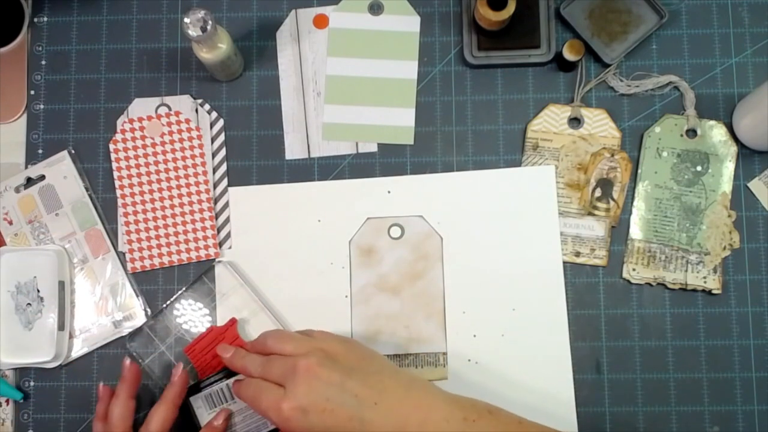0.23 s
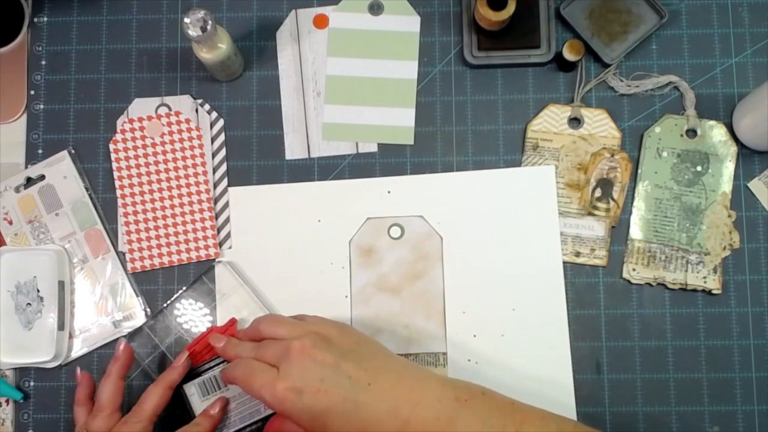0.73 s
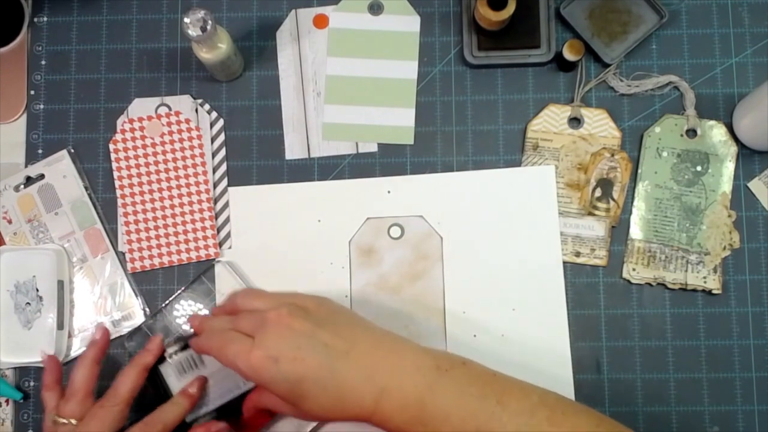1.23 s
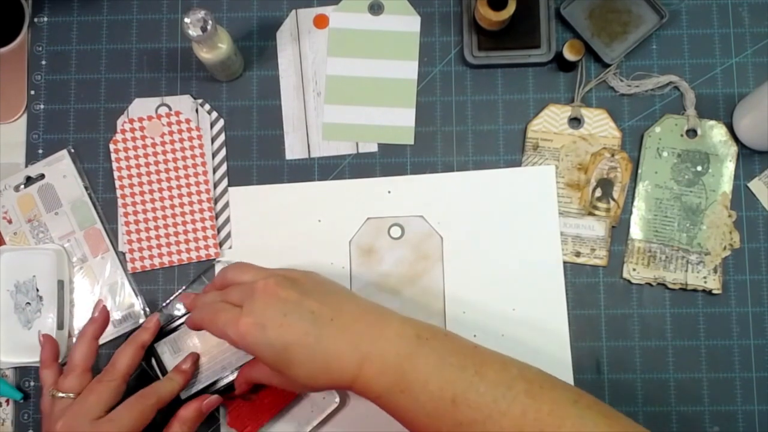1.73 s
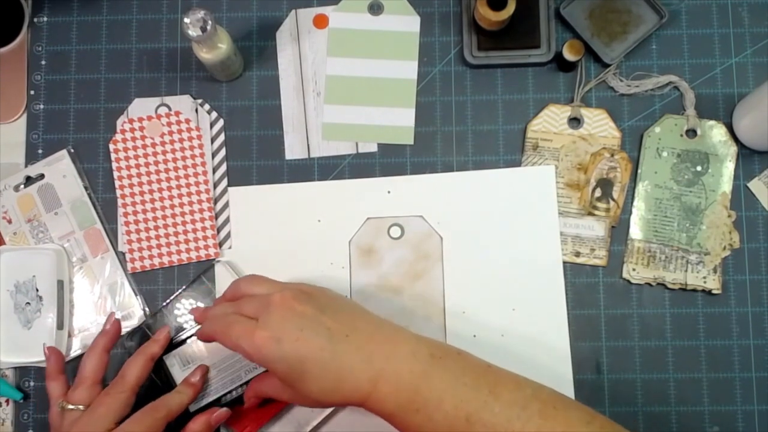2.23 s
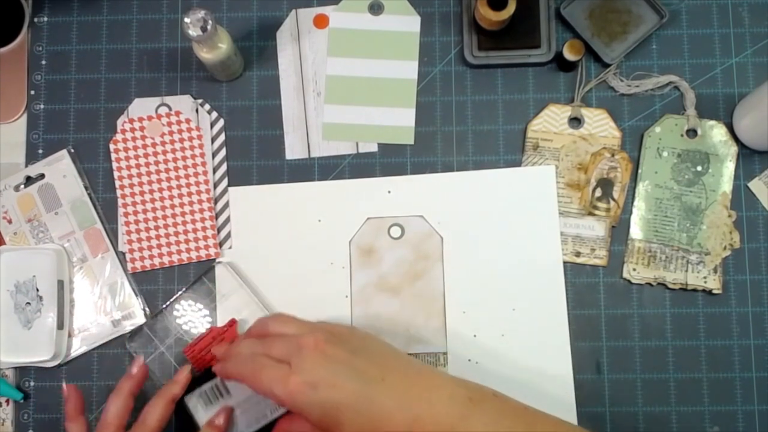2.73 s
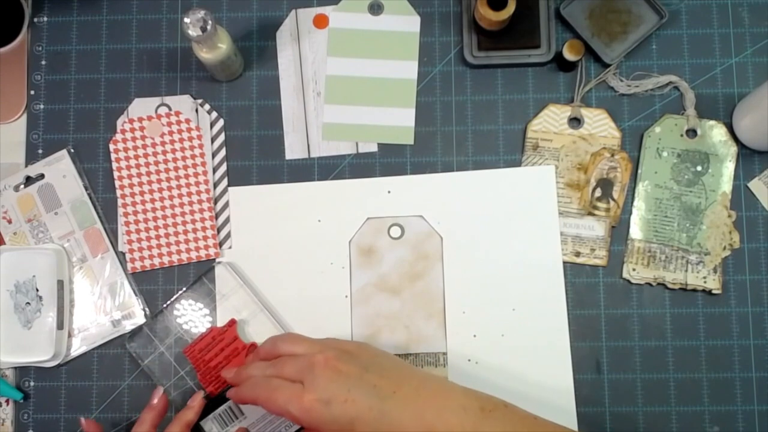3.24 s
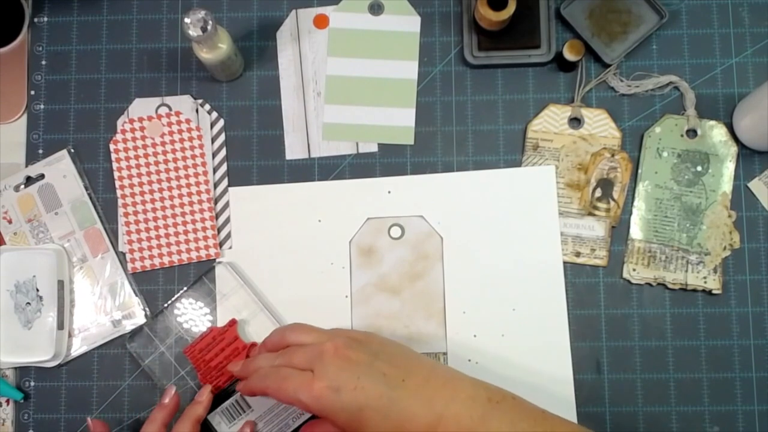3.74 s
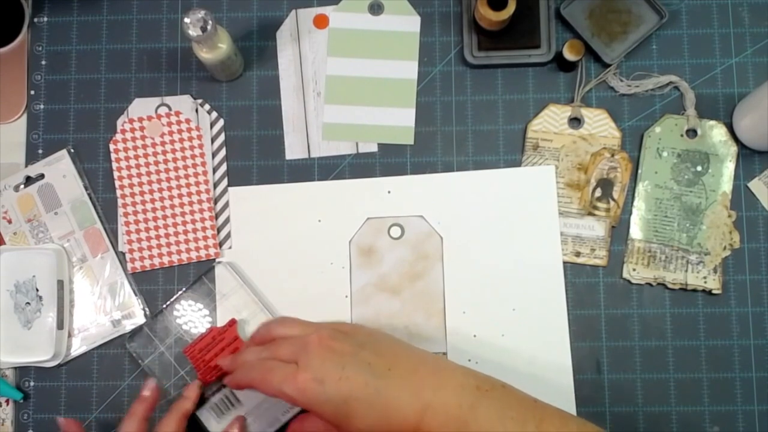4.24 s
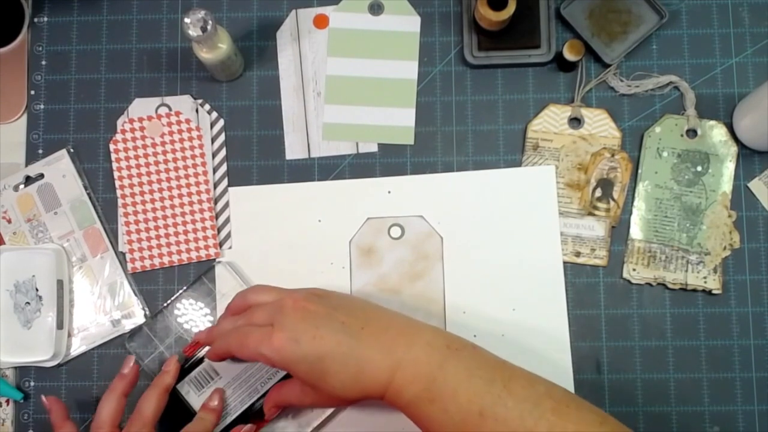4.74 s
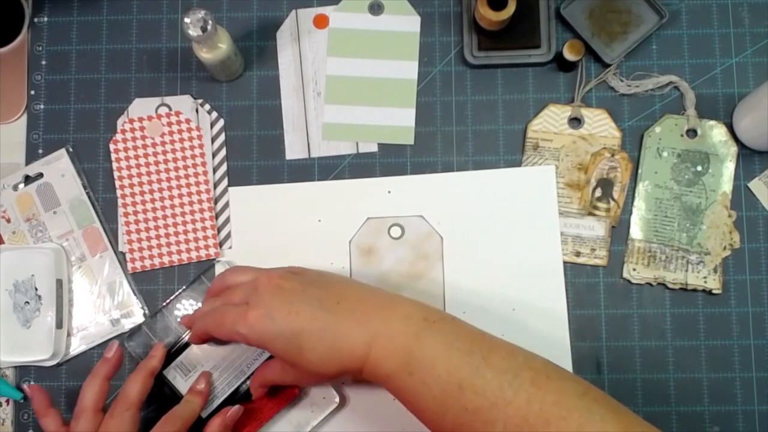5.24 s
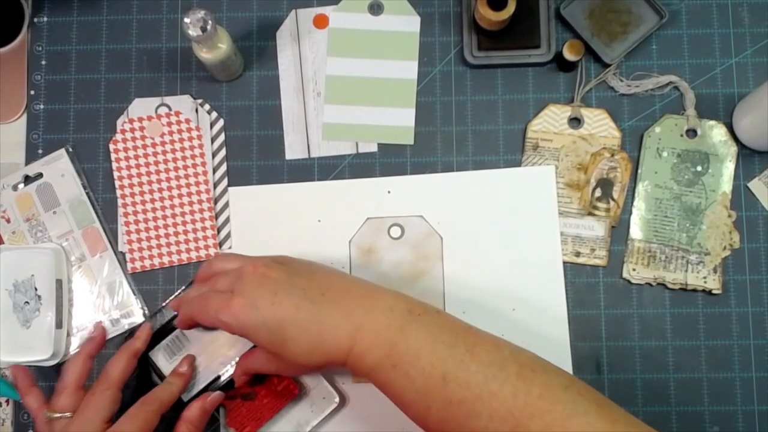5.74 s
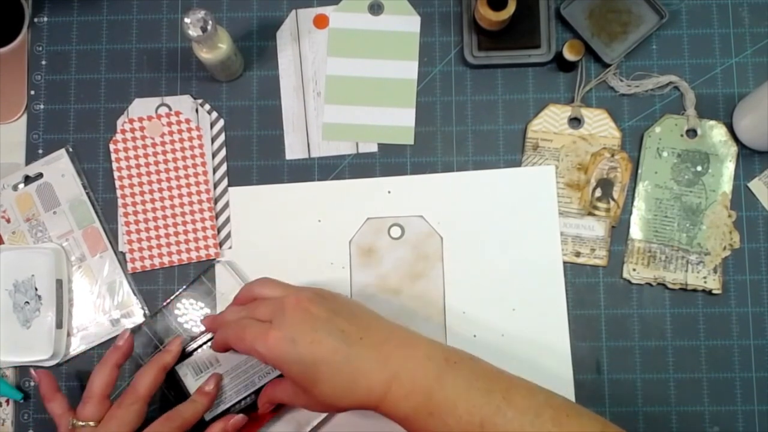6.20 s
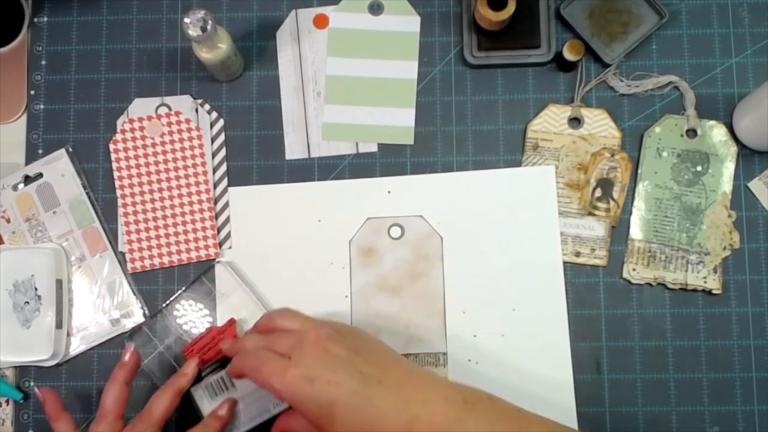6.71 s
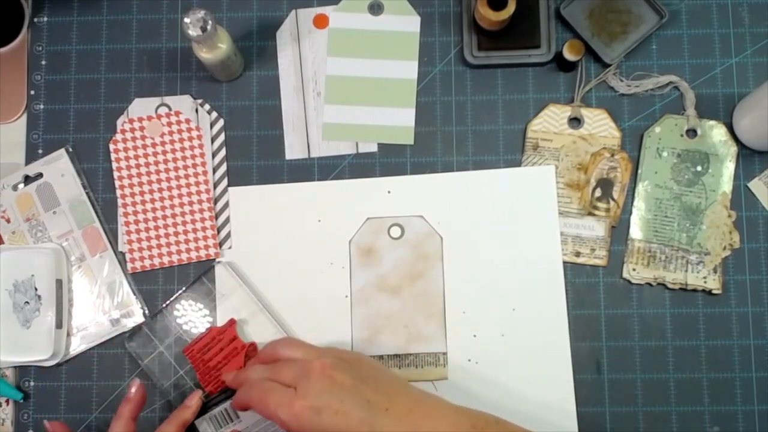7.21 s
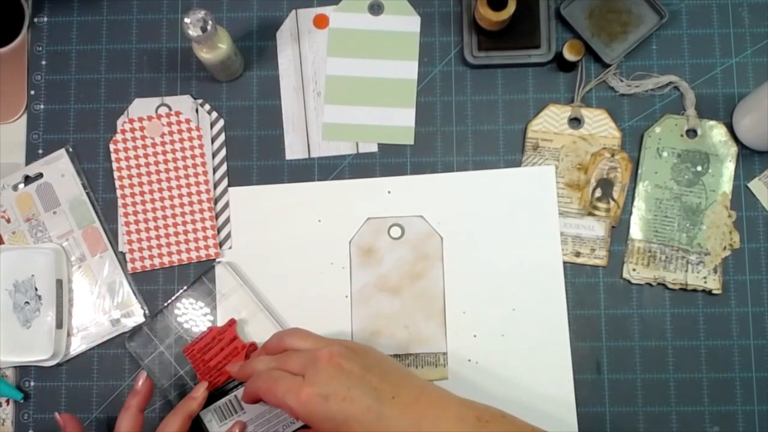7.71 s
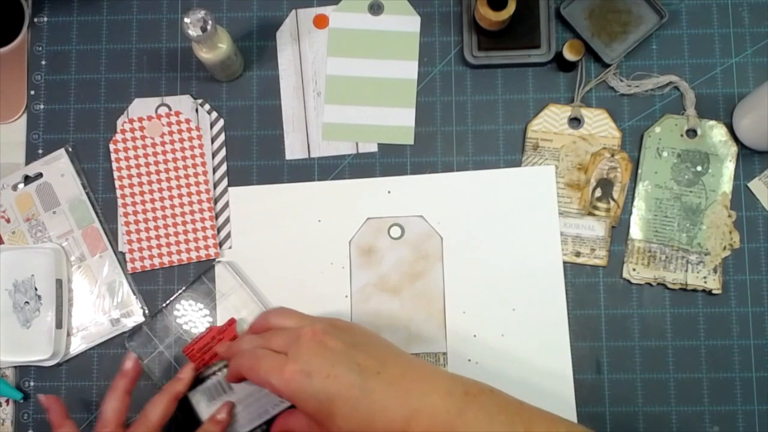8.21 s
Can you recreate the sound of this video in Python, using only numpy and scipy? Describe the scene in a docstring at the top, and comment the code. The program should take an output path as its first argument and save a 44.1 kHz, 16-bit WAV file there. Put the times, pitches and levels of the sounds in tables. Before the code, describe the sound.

Over a steady low hum and the soft rush of a fan, an ink pad pats a rubber stamp on a desk in a regular rhythm. The dull taps, a few harder than the rest, shake the nearby microphone and make a loose part knock lightly. Tacky ink crackles faintly, the plastic case clicks now and then, and the pad briefly judders about halfway through. The small room adds little echo.

```python
"""A low mains hum and a fan sound throughout; over them an ink pad is dabbed 22 times onto a rubber stamp. Each
impact rings the modes of the stamp's block and the desk and sets the microphone's stand swaying; a loose part
knocks on the first swings. Threads of tacky ink snap as the pad is pressed and peeled off. The plastic case
clicks and squeaks now and then, after the hardest dab the block rocks and drops back with a clatter, and once
the pad judders by stick-slip friction."""
import sys
import numpy as np
from scipy import signal
from scipy.fft import rfft, irfft
from scipy.io import wavfile
from scipy.ndimage import uniform_filter1d

SR = 44100
rng = np.random.default_rng(int(sys.argv[2]) if len(sys.argv) > 2 else 0)


def materialize(psi):
    """Save the field psi as 16-bit PCM at rate SR to the path in sys.argv[1].

    A 1-D psi becomes a single channel; in a 2-D psi each row is a channel.
    """
    bounded = np.clip(np.atleast_2d(psi).T, -1, 1)
    quanta = np.round(bounded * 32767).astype(np.int16)
    wavfile.write(sys.argv[1], SR, quanta)


N = 373086

# Sustained tones, the mains hum first and then the fan's whines: (frequency [Hz], rms level [dB])
TONES = [(120, -44.7), (3462, -75.5), (3995, -70.7), (4662, -76.5), (5717, -85)]
# Impacts of the pad, with relative levels:
# (time [s], thump [dB], desk tuning [Hz], clack [dB], rattle [dB], time held down [s], peel [dB])
DABS = [(.541, -21, 90, -40, -39, .195, -63), (.91, -17, 84, -33, -31, .206, -64),
        (1.303, -17.3, 76, -23.5, -31.5, .2, -67), (1.674, -21, 78, -37, -33, .2, -74),
        (2.076, -22, 77, -48, -36, .203, -65), (2.462, -10.7, 82, -24.5, -30, .187, -63),
        (2.831, -24.5, 72, -31, -31.5, .197, -68), (3.187, -21.5, 84, -35, -32.3, .223, -67),
        (3.563, -21, 74, -41, -34, .2, -74), (3.922, -21.5, 76, -37, -33, .208, -67),
        (4.294, -22, 76, -35, -32, .195, -64), (4.652, -24, 80, -41, -32.5, .19, -64),
        (5.027, -15.3, 74, -18.5, -33, .238, -67), (5.371, -27, 70, -44, -32.5, .2, -74),
        (5.703, -18.5, 77, -31, -31, .2, -73), (6.078, -21, 81, -56, -39, .2, -71),
        (6.444, -23.5, 80, -35, -32, .207, -58.5), (6.806, -21.5, 90, -40, -39, .227, -61),
        (7.173, -23, 86, -48, -34, .2, -74), (7.55, -18, 80, -26, -32.5, .21, -65),
        (7.912, -27, 82, -35, -34, .196, -59), (8.267, -18, 76, -40, -31.5, .2, -72)]
USUAL_THUMP_DB, USUAL_CLACK_DB, USUAL_RATTLE_DB = -21, -36, -33  # an ordinary dab


def amp(db):
    return 10 ** (np.asarray(db) / 20)


def unit_rms(x):
    return x / np.sqrt(np.mean(x ** 2) + 1e-20)


def clock(seconds):
    return np.arange(int(seconds * SR)) / SR


def spectrum_db(points, hz):
    f, db = np.transpose(points)
    return np.interp(np.log(hz + 1), np.log(f + 1), db)


def add(mix, s, sound):
    part = mix[max(round(s * SR), 0):][:len(sound)]
    part += sound[:len(part)]


def colour(x, spectrum):
    """Minimum-phase filtering imposes a spectrum at unit power gain."""
    size = 2048
    log_gain = np.log(amp(spectrum_db(spectrum, abs(np.fft.fftfreq(size, 1 / SR)))))
    taps = np.fft.ifft(np.exp(np.conj(signal.hilbert(log_gain)))).real[:size // 2]
    return signal.oaconvolve(x, taps / np.linalg.norm(taps))[:len(x)]


def band_noise(edges_hz, count):
    band = signal.butter(2, edges_hz, "band", fs=SR, output="sos")
    return unit_rms(signal.sosfilt(band, rng.standard_normal(count)))


def ring_band(hz, width, t60):
    """Overlapping damped modes act as a band of noise that decays exponentially."""
    t = clock(.2)
    edges = np.minimum(hz * np.exp(np.array([-width, width]) / 2), SR / 2 - 1)
    return band_noise(edges, len(t)) * amp(-60 * t / t60)


def ring_modes(modes, contact_s, rise_cycles, pitch=1, vary_db=2, detune=.019):
    """An impact response is the sum of damped modes convolved with the force pulse; its peak is 1."""
    t = clock(.4)
    free = np.zeros(len(t))
    for hz, db, t60 in modes:
        louder, sharper = rng.standard_normal(2)  # each blow lands a little differently
        cycles = hz * pitch * (1 + detune * sharper) * t
        envelope = amp(db + vary_db * louder - 60 * t / t60) * (1 - np.exp(-cycles / rise_cycles))
        free += envelope * np.cos(2 * np.pi * cycles)
    force = np.sin(np.pi * clock(contact_s) / contact_s) ** 2
    out = signal.fftconvolve(free, force)[:len(t)]
    return out / abs(out).max()


def hardness(thump, clack):
    """Impact strength in dB above an ordinary dab, weighted from thump and clack."""
    return .7 * (thump - USUAL_THUMP_DB) + .35 * (clack - USUAL_CLACK_DB)


def mains_hum():
    """Alternating current drives a vibration of fixed frequency, heard as a pure tone."""
    hz, db = TONES[0]
    return np.sqrt(2) * amp(db) * np.sin(2 * np.pi * hz * np.arange(N) / SR)


def fan(air_db=-48.7, waver_hz=7):
    """Housing resonances shape broadband air noise; faint whines waver in pitch and swell."""
    # Air noise: (frequency [Hz], relative spectral level [dB])
    air_spectrum = [(15, -41), (30, -31), (58, -27.5), (92, -36), (135, -30), (170, -33), (245, -41.5),
                    (340, -37), (480, -37), (600, -44.5), (1300, -43.5), (1850, -50.5), (4300, -53),
                    (6500, -52.5), (7150, -61), (10000, -65), (15500, -70.5)]
    # Peaks and a dip of the housing's response: (frequency [Hz], width [Hz], gain [dB])
    housing = [(467, 62, 2.5), (970, 116, 7.5), (1300, 66, 4), (2206, 150, 4), (2560, 200, 8),
               (3030, 50, 6), (4450, 340, -4.5), (5340, 600, -0.5)]
    # Swell of the whines: (time [s], gain [dB])
    whine_swell = [(0, 1), (2.7, .5), (3.7, -2.5), (4.5, -2), (5.1, 1), (8.4, -.5)]
    hz, t = np.fft.rfftfreq(N, 1 / SR), np.arange(N) / SR
    housing_db = sum(db / (1 + (2 * (hz - f) / width) ** 2) for f, width, db in housing)
    shape = amp(spectrum_db(air_spectrum, hz) + housing_db)
    out = amp(air_db) * unit_rms(irfft(rfft(rng.standard_normal(N)) * shape, N))
    swell_db = np.interp(t, *np.transpose(whine_swell))
    for f, db in TONES[1:]:
        drift = waver_hz * unit_rms(uniform_filter1d(rng.standard_normal(N), 2000))
        out += np.sqrt(2) * amp(db + swell_db) * np.sin(2 * np.pi * np.cumsum(f + drift) / SR)
    return out


def crackles(fizz_db=5, crunch_db=7, grain_db=4, snaps_per_s=7000, tail=.41):
    """Shot noise: snapping ink threads and faint handling ticks are brief clumps of tiny impulses."""
    # Louder single crackles of tacky ink as the pad presses or lifts, and a few handling ticks:
    # (time [s], relative fizz [dB], relative crunch [dB], length [s])
    loud_crackles = [(.133, -70, -64, .03), (.795, -68, -63, .03), (1.325, -62, -53, .04),
                     (1.395, -69, -52, .007), (2.033, -61, -55, .005), (2.478, -50.5, -48, .024),
                     (2.517, -53.5, -53, .012), (2.889, -56, -52, .008), (3.587, -63, -57, .015),
                     (4.862, -66, -56, .03), (5.082, -57, -52, .008), (7.553, -57, -60, .006),
                     (7.812, -62.5, -57, .006), (8.287, -66, -59, .045)]
    # The bright part of a crackle: (frequency [Hz], relative spectral level [dB])
    fizz_spectrum = [(1000, -17), (4000, -34.5), (6500, 16), (8500, 10), (10300, 7.5), (12500, -1.5),
                     (16000, -5.5)]
    # The darker part: (frequency [Hz], relative spectral level [dB])
    crunch_spectrum = [(200, 11.5), (600, 5), (1300, 5), (1900, -0.5), (2500, 5), (4000, -6.5),
                       (6000, -9.5), (9000, -16), (16000, -21.5)]
    presses, peels = [], []
    for s, thump, _, clack, _, held, peel in DABS:
        squeeze_db = .6 * hardness(thump, clack)
        presses.append((s + .019, squeeze_db - 68, squeeze_db - 60.5, .04))
        peels.append((s + held, peel, peel + 2, .016))
    faint_ticks = [(s, -71, -66, .012) for s in rng.uniform(0, N / SR, 14)]
    fizz, crunch, t = np.zeros(N), np.zeros(N), clock(.25)
    for s, high, mid, length in presses + peels + loud_crackles + faint_ticks:
        snaps = rng.standard_normal(len(t)) * amp(grain_db * np.minimum(rng.exponential(1, len(t)), 3))
        snaps *= rng.random(len(t)) < snaps_per_s / SR
        envelope = np.minimum(t / (.19 * length), 1) * np.exp(-np.maximum(t / length - .6, 0) / tail)
        clump = unit_rms(snaps) * envelope
        add(fizz, s, amp(high + fizz_db) * clump)
        add(crunch, s, amp(mid + crunch_db) * clump)
    return colour(fizz, fizz_spectrum) + colour(crunch, crunch_spectrum)


def clicks_and_clatter(gain_db=-1):
    """Impulsive excitation rings a wide band of the plastic case's modes; after the hardest dab the stamp's
    block rocks and drops back with a lower clatter."""
    # Clicks of the case, and the block's clatter after the hardest dab: (time [s], relative level [dB], centre
    # [Hz], bandwidth [ratio], t60 [s])
    clicks = [(.138, -53, 2400, .8, .15), (.215, -43, 2800, .6, .024), (2.482, -35.5, 2900, .8, .016),
              (2.4842, -26, 750, 1.4, .02), (2.51, -38, 1300, 1.3, .035), (3.269, -41, 2360, .7, .029),
              (4.88, -45.5, 3870, .8, .02), (5.0276, -31, 3600, .3, .007), (6.441, -42, 2770, .3, .02),
              (6.446, -33, 3900, 1.9, .017)]
    out = np.zeros(N)
    for s, db, hz, width, t60 in clicks:
        add(out, s, amp(db + gain_db) * ring_band(hz, width, t60))
    return out


def dabs(felt_s=.0033, edge_s=.0014, rebound_s=.047, tick_t60=.025, stiffening=.15):
    """Contact time limits bandwidth: the pad's edge ticks and clacks, then its felt thumps the desk."""
    # Modes of the desk: (nominal frequency [Hz], relative level [dB], t60 [s])
    desk_modes = [(66, -11, 0.15), (81.3, 3, 0.091), (99, -4, 0.099), (134, -6.5, 0.11),
                  (172, -17.5, 0.068)]
    # Modes of the stamp's block: (frequency [Hz], relative level [dB], t60 [s])
    block_modes = [(208.5, -6, 0.043), (255, 0.5, 0.043), (331, -5.5, 0.062), (350.6, 2.5, 0.06),
                   (415, 0.5, 0.058), (503, -13, 0.046), (720, -10, 0.035)]
    # Tick of first contact: (frequency [Hz], relative spectral level [dB])
    tick_spectrum = [(300, -36), (700, 5), (1300, 7), (2000, 0), (3000, 1), (4500, -8), (6500, -11),
                     (15000, -28)]
    nominal_desk_hz = 79
    out, ticks, t = np.zeros(N), np.zeros(N), clock(.1)
    for s, thump, hz, clack, rattle, *_ in DABS:
        hard = hardness(thump, clack)
        seat_s = .0005 - .0001 * hard  # a harder dab seats sooner and more briefly
        contact_s = felt_s * amp(-stiffening * hard)
        # the desk is jolted a second time as the stand swings back
        for delay, db in (seat_s, thump + 1.6), (rebound_s, rattle - 4):
            desk = ring_modes(desk_modes, contact_s, .33, pitch=hz / nominal_desk_hz, vary_db=1.5)
            add(out, s + delay, amp(db) * desk)
        block = ring_modes(block_modes, edge_s, rise_cycles=.65, detune=.04)
        add(out, s + .0007, amp(clack - 2) * block)
        add(ticks, s, amp(hard - 47.5 - 60 * t / tick_t60) * rng.standard_normal(len(t)))
    return out + colour(ticks, tick_spectrum)


def desk_shudder(gain_db=-6, clack_share=.36, rise_s=.0097, t60=.26):
    """Each impact spreads into the desk top's many close modes, which merge into decaying noise."""
    # The close modes taken together: (frequency [Hz], relative spectral level [dB])
    desk_spectrum = [(40, -34.5), (90, -0.5), (150, 1), (205, 3.5), (255, -7), (340, -7), (480, -19.5),
                     (650, -29.5), (1500, -33), (6000, -55)]
    out, t = np.zeros(N), clock(.3)
    envelope = (1 - np.exp(-t / rise_s)) * amp(gain_db - 60 * t / t60)
    for s, thump, _, clack, *_ in DABS:
        add(out, s, amp(thump + clack_share * (clack - thump)) * envelope * rng.standard_normal(len(t)))
    return colour(out, desk_spectrum)


def stand_sway(hz=30.74, t60=.74, gain_db=-19.5, rise_s=.064):
    """The microphone's stand is a damped oscillator that swings wider when the desk is shaken harder."""
    out, t = np.zeros(N), clock(.82)
    swing = -np.sin(2 * np.pi * hz * t) * (1 - np.exp(-t / rise_s)) * amp(gain_db - 60 * t / t60)
    for s, thump, _, _, rattle, *_ in DABS:
        drive_db = .25 * (thump - USUAL_THUMP_DB) + .35 * (rattle - USUAL_RATTLE_DB)
        add(out, s, amp(drive_db) * swing)
    return out


def loose_knocks(contact_s=.0003, lead_s=.0012, hz=740, spread_hz=18, nominal_hz=750):
    """Impact rattling: on the stand's first swings a loose part strikes, rings and bounces once."""
    # Knocks after a dab: (delay [s], lag per rattle [s/dB], gain [dB], gain per hardness [dB/dB])
    swings = [(.028, 0, -12.5, 1.05), (.0436, .0005, .8, 0), (.0718, .0012, -.5, -.15)]
    # Modes of the loose part: (nominal frequency [Hz], relative level [dB], t60 [s])
    loose_modes = [(205, -7, 0.19), (755, 6.5, 0.04), (727, -5, 0.027), (822, -14.5, 0.043),
                   (980, -7.5, 0.056), (1585, -2, 0.014), (1620, -2, 0.014), (2150, -6, 0.012),
                   (2560, -10, 0.015), (3760, -22, .008)]
    out = np.zeros(N)
    for s, thump, _, clack, rattle, *_ in DABS:
        for lag, lag_per_db, db, per_hardness in swings:
            at = s + lag + lag_per_db * (rattle - USUAL_RATTLE_DB)  # thrown harder, it lands later
            knock_db = rattle + db + per_hardness * hardness(thump, clack)
            pitch = (hz + spread_hz * rng.standard_normal()) / nominal_hz
            bounce_s, bounce_db = rng.uniform(.0023, .016), rng.normal(-13, 3)
            for delay, gain_db in (-lead_s, 1), (bounce_s, bounce_db):
                knock = ring_modes(loose_modes, contact_s, rise_cycles=1.98, pitch=pitch)
                add(out, at + delay, amp(knock_db + gain_db) * knock)
    return out


def case_squeaks(gain_db=-1):
    """Friction excites a few narrow resonances of the case, spaced like a bar's bending modes."""
    # Squeaks: (time [s], relative level [dB], lowest partial [Hz], t60 [s])
    squeaks = [(.797, -52.5, 1620, .3), (1.33, -42.5, 4630, .05), (2.492, -48, 6860, .058)]
    # Partials of a squeak: (frequency [ratio], gain [dB], bandwidth [ratio])
    partials = [(1, 0, .06), (2.75, -5, .16), (5.9, -8, .13)]
    out = np.zeros(N)
    for s, db, hz, t60 in squeaks:
        for ratio, partial_db, width in partials:
            if hz * ratio < SR / 4:
                add(out, s, amp(db + partial_db + gain_db) * ring_band(hz * ratio, width, t60))
    return out


def judder(start_s=4.43, rise_s=.07, length_s=.265, release_s=.02, hz=104, waver_hz=9, level_db=-38.3):
    """Stick-slip friction shakes the desk at an uneven rate while the pad drags on the rubber."""
    t = np.arange(N) / SR - start_s
    drag = np.clip(t / rise_s, 0, 1) * np.clip(1 - (t - length_s) / release_s, 0, 1)
    slip_hz = hz + waver_hz * unit_rms(uniform_filter1d(rng.standard_normal(N), 600))
    slips = np.sqrt(2) * np.sin(2 * np.pi * np.cumsum(slip_hz) / SR)
    rub = amp(-12) * band_noise([60, 190], N)
    return amp(level_db) * drag * (slips + rub)


def room(x, t60=.18, echoes_per_s=2500):
    """Reverberation of a small furnished room: sparse, fast-dying reflections with little bass or top."""
    t = clock(.4)
    echoes = rng.standard_normal(len(t)) * (rng.random(len(t)) < echoes_per_s / SR)
    echoes *= (t > .004) * amp(-60 * t / t60)
    walls = signal.butter(2, [450, 11000], "band", fs=SR, output="sos")
    return signal.oaconvolve(x, signal.sosfilt(walls, echoes / np.linalg.norm(echoes)))[:N]


def scene():
    """Direct sound and reflections superpose; the loose part is near the microphone, so nearly dry."""
    hands = dabs() + crackles() + clicks_and_clatter() + case_squeaks()
    loose = loose_knocks()
    reflections = room(amp(-8) * hands + amp(-14) * loose)
    vibration = desk_shudder() + stand_sway() + judder()
    return (hands + loose + reflections + vibration + mains_hum() + fan())[None]


def record(dry):
    """A linear-phase low-pass filter limits the bandwidth."""
    cutoff_hz = 15900
    low_pass = signal.firwin(511, cutoff_hz, window=("kaiser", 9), fs=SR)
    return signal.oaconvolve(dry, low_pass[None], "same")


dry = scene()
out = record(dry)
materialize(out)
```